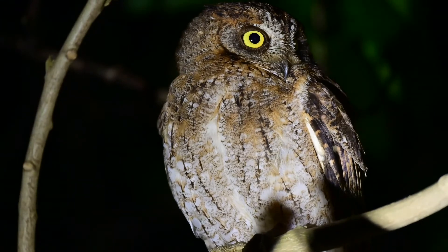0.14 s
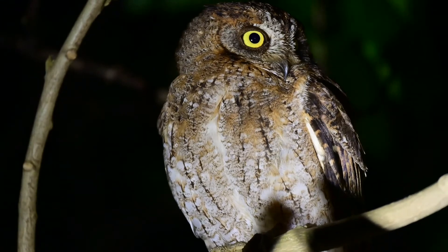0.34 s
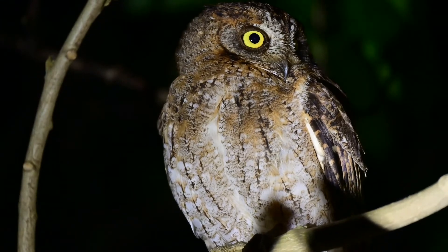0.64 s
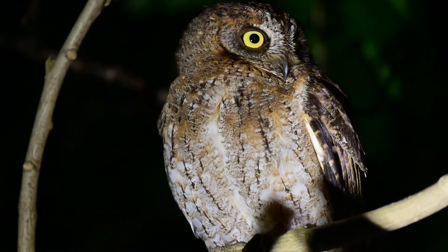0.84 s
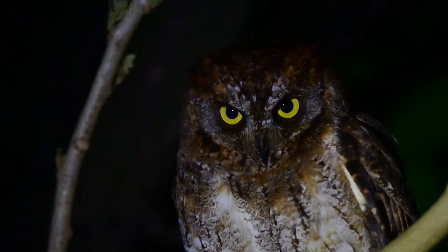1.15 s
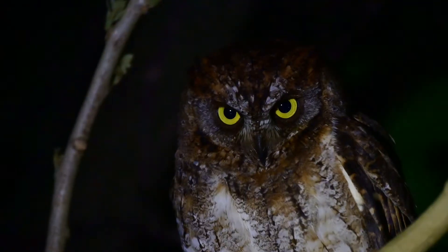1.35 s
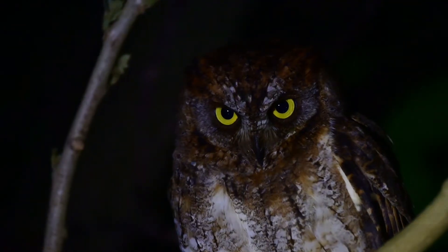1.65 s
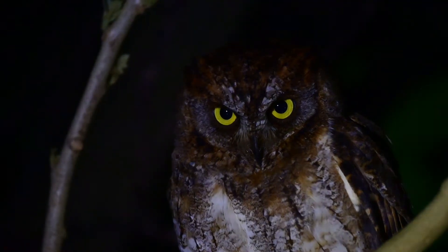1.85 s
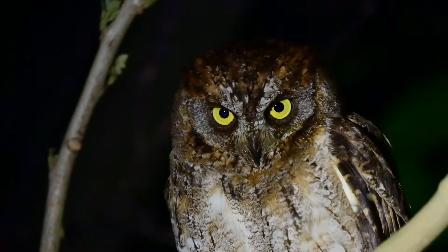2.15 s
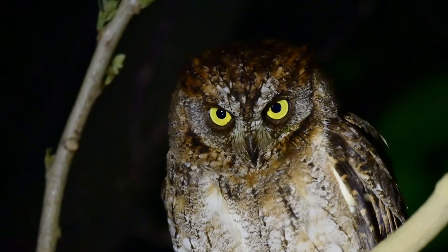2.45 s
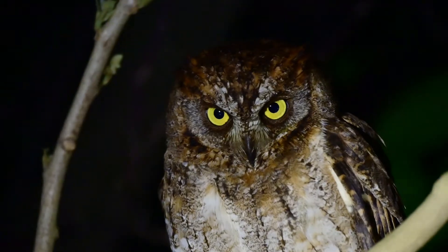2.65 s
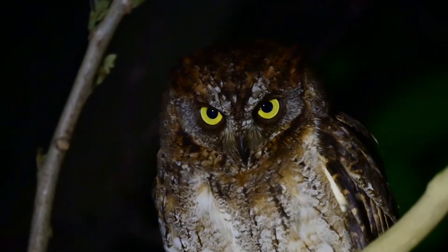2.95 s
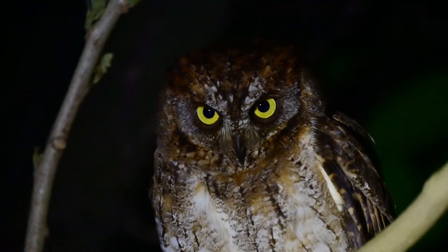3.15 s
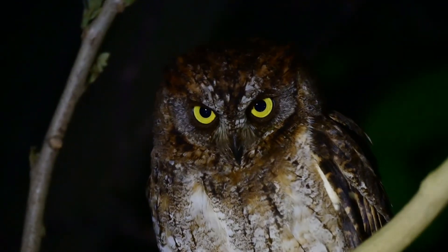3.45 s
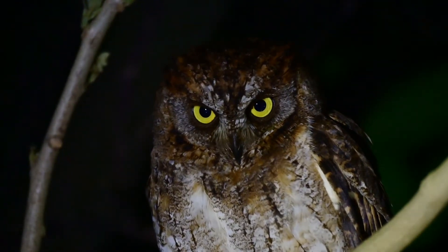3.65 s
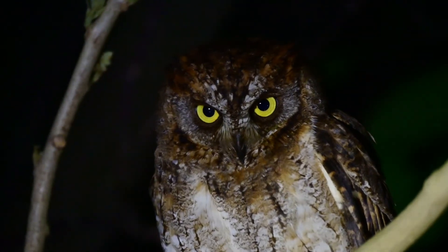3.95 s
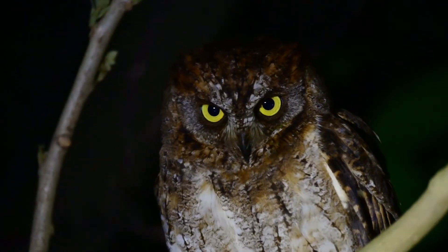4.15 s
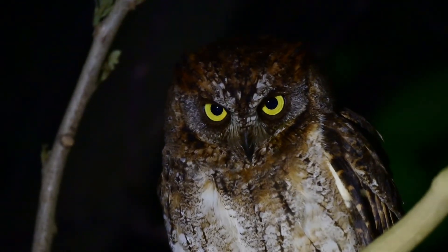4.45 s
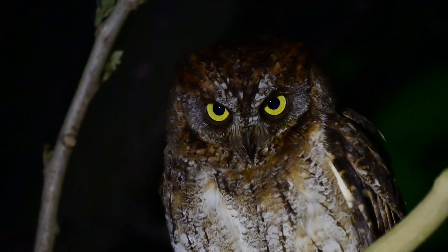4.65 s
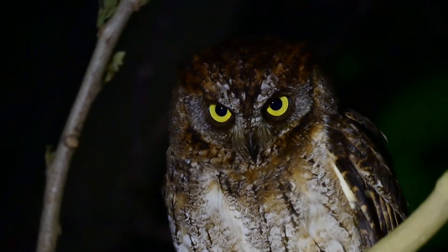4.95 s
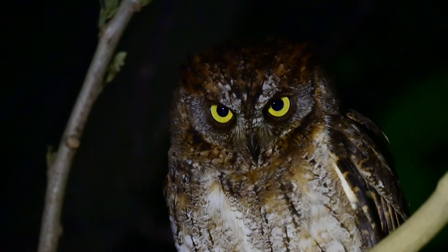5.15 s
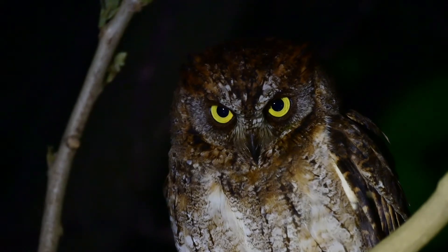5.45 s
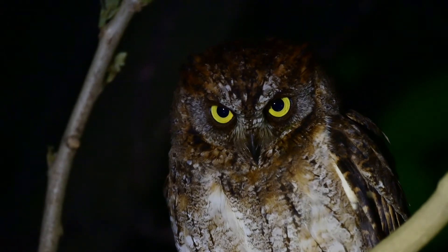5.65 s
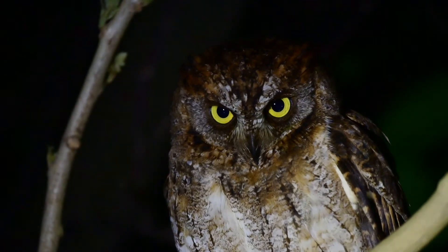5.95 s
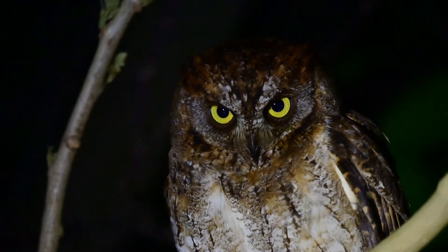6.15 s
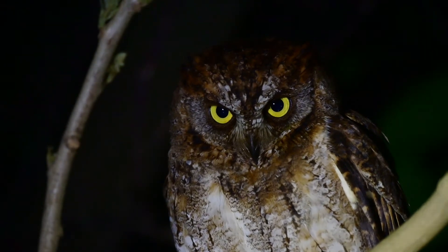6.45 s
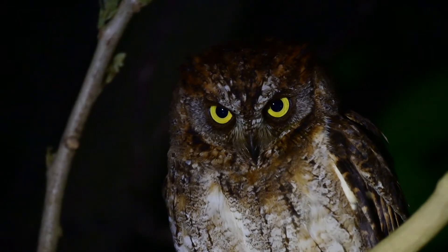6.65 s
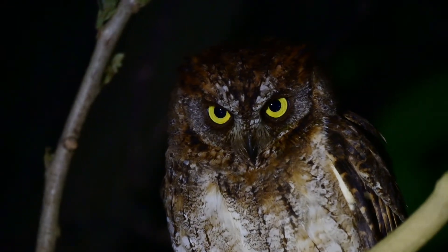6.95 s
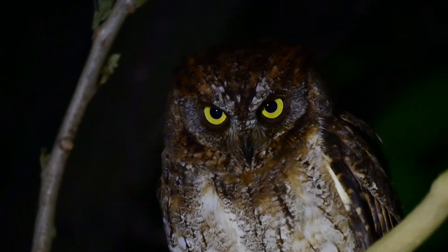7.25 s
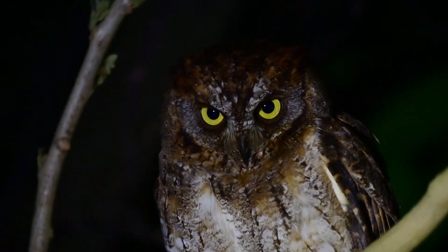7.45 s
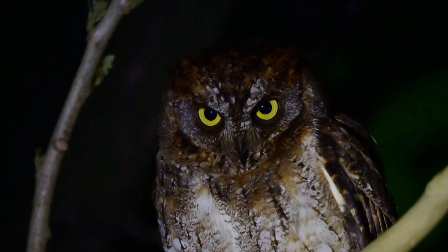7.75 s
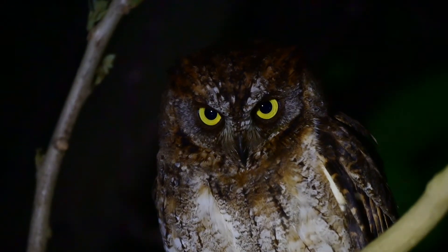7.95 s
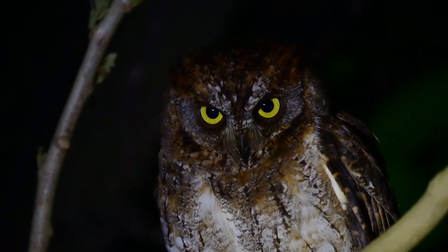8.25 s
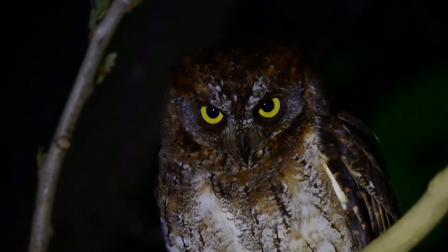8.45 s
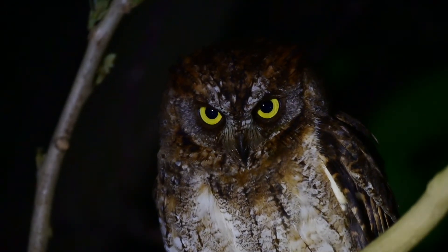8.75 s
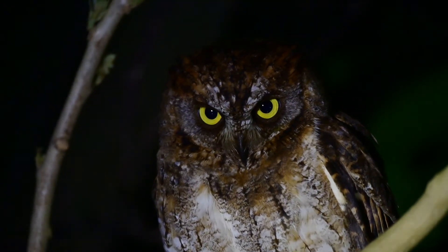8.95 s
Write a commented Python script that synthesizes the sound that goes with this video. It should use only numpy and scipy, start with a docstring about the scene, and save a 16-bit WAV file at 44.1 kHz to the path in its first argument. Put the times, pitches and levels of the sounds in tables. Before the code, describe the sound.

A loud rush of water cuts off abruptly, leaving a quiet night wood where two small owls hoot together over faint cricket chirps and trills.

```python
"""Owls in a wood at night

Two small owls, one low and one higher with a yelp, hoot from the left as gliding tones; the trees echo them.
A third yelps far away. Wing-pulse tones make crickets chirp and trill, and there are a few high peeps.
Ringing modes make drops tick on leaves, rising blips make plinks in water; murmur, hiss and a far chorus
are soft noise. For the first second a loud rush of water, churning noise on the right, covers everything,
then is cut off.
"""
import sys
import numpy as np
from scipy import signal
from scipy.fft import rfft, irfft, next_fast_len
from scipy.io import wavfile
from scipy.ndimage import uniform_filter1d, map_coordinates

SR = 44100
rng = np.random.default_rng(int(sys.argv[2]) if len(sys.argv) > 2 else 0)


def waveform_to_disk(signal):
    """Save audio, clipped to [-1, 1], as 16-bit WAV at the path in sys.argv[1]."""
    frames = np.transpose(np.atleast_2d(signal))
    scaled = np.clip(frames, -1, 1) * 32767
    samples = np.round(scaled).astype(np.int16)
    wavfile.write(sys.argv[1], SR, samples)


N = 400869  # length in samples
LEFT_RIGHT = np.array([[1], [-1]])  # half a left-right difference goes up on the left, down on the right


def amp(db):
    """Turn decibels into a plain factor."""
    return 10 ** (np.asarray(db) / 20)


def unit(x):
    """Scale a sound to an rms of 1."""
    return x / np.sqrt(np.mean(x ** 2) + 1e-20)


def along(points, hz):
    """Read a curve of (Hz, value) points at any frequency, on a log axis."""
    f, v = np.transpose(points)
    return np.interp(np.log(hz + 1), np.log(f + 1), v)


def wobble(rate):
    """A smooth random curve through rate random points a second."""
    knots = rng.standard_normal(int(N * rate / SR) + 4)
    return map_coordinates(knots, [np.arange(N) * rate / SR])


def filtered(x, response):
    """Make each frequency of x louder or softer by response(hz)."""
    m = next_fast_len(N + SR // 2)
    hz = np.fft.rfftfreq(m, 1 / SR)
    return irfft(rfft(x, m) * response(hz), m)[..., :N]


def band(x, center_hz, half_width_hz):
    """Keep a band of frequencies around a center."""
    return filtered(x, lambda hz: 1 / (1 + ((hz - center_hz) / half_width_hz) ** 4))


def add(track, s, sound):
    """Mix a short sound into the track at s seconds."""
    start = round(s * SR)
    part = track[..., start:start + sound.shape[-1]]
    part += sound[..., :part.shape[-1]]


def series(first, last, gap):
    """Shares 0-1 of a span filled with evenly spaced beats about gap apart."""
    return np.linspace(0, 1, round((last - first) / gap) + 1)


def bump(t):
    """A gentle rise and fall over the times t."""
    return np.sin(np.pi * t / t[-1])


def spread(pair, spectrum, alike, side, lead):
    """Color two unrelated noises and mix them to a given likeness, balance and phase lead; their mean has rms 1."""
    def shares(hz):
        turn = np.arccos(np.clip(along(alike, hz), -1, 1)) / 2
        return amp(along(spectrum, hz)) * [np.cos(turn), np.sin(turn)]

    def place(hz):
        lean = amp(along(side, hz) / 2 * LEFT_RIGHT)
        shift = np.exp(.5j * along(lead, hz) * LEFT_RIGHT)
        return shift * lean / np.sqrt(np.mean(lean ** 2, axis=0))

    common, opposite = filtered(pair, shares)
    both = filtered(np.array([common + opposite, common - opposite]), place)
    return both / np.sqrt(np.mean(both.mean(axis=0) ** 2))


def patchy(depth_db):
    """Two white noises sharing patches of random gain in time and frequency."""
    z = signal.stft(rng.standard_normal((2, N)), nperseg=512)[2]
    field = uniform_filter1d(rng.standard_normal(z.shape[1:]), size=6, axis=0)
    field = uniform_filter1d(field, size=10, axis=1)
    return signal.istft(z * amp(depth_db * unit(field)), nperseg=512)[1][:, :N]


def wood(voice, paths, tail_db, t60, dull_hz=20000):
    """Single echoes from big trunks and a scattered tail from all the others; foliage dulls them above dull_hz."""
    t = np.arange(SR) / SR
    # The tail falls by 60 dB in t60 seconds
    tail = rng.standard_normal((2, SR)) * amp(-60 * t / t60) * np.clip(t / .02, 0, 1)
    answer = amp(tail_db) * tail / np.linalg.norm(tail[0])
    for delay, left_db, right_db in paths[1:]:
        answer[:, round(abs(delay) * SR)] += amp([left_db, right_db])
    echoes = signal.fftconvolve(voice[None], answer, axes=1)[:, :N]
    direct = voice * amp(paths[0][1:])[:, None]
    return direct + filtered(echoes, lambda hz: 1 / (1 + (hz / dull_hz) ** 6))


def night():
    """Distant murmur and microphone hiss: soft colored noise whose level drifts slightly."""
    # The still wood. Each row: frequency in Hz, relative level in dB per Hz
    night_spectrum = [(24, -46), (40, -24.5), (100, -13.5), (220, -4.5), (360, -2), (600, -5), (1000, -7),
                      (1500, -13.5), (2500, -17), (3200, -18.5), (4200, -18), (5000, -17), (6500, -20),
                      (15600, -22)]
    # How alike left and right are. Each row: frequency in Hz, likeness from -1 to 1
    night_alike = [(60, 0.98), (180, -0.14), (550, 0.39), (1650, 0.21), (4970, 0.21), (15000, -0.094)]
    # Balance. Each row: frequency in Hz, left-right difference in dB
    night_side = [(60, 3), (150, 0.5), (380, 6.5), (950, 4.5), (2380, 1), (5980, 0), (15000, 0.0)]
    noise = spread(patchy(0.79), night_spectrum, night_alike, night_side, lead=[(60, 0)])
    return amp(-62.0 + 0.37 * wobble(1.707)) * noise


def chorus():
    """Far night chorus: a low band throbbing with fast pulses, perhaps frogs, and two smooth insect bands above it."""
    pulse_hz = 72 + 0.615 * wobble(3)
    pulses = np.maximum(np.sin(2 * np.pi * np.cumsum(pulse_hz) / SR), 0)
    throb = band(pulses * rng.standard_normal((2, N)), 2510, 90)
    haze = band(rng.standard_normal((2, N)), 4050, 250)
    thin = band(rng.standard_normal((2, N)), 5380, 110)
    # Each band swells slowly by itself
    throb = amp(-81.0 + 1.5 * wobble(2.43)) * unit(throb)
    haze = amp(-78.5 + 1.2 * wobble(5)) * unit(haze)
    thin = amp(-83.0 + 3 * wobble(4.9)) * unit(thin)
    return throb + haze + thin


def stroker():
    """A cricket's wing strokes: each slows down, so its pitch falls; uneven teeth roughen it."""
    # Runs of strokes. Each row: first stroke in seconds, last stroke in seconds, level in dB before the wood
    runs = [(1.054, 1.277, -68), (2.419, 2.705, -68), (3.39, 3.461, -69), (4.576, 4.929, -67.5),
            (5.402, 5.47, -70), (5.508, 5.713, -67), (7.698, 8.113, -66), (8.78, 8.978, -65)]
    gap_s, hurry_s = .07, .005  # usual gap; how early the middle of a run falls
    first_db = -5  # a run starts weaker
    out, t = np.zeros(N), np.arange(round(.045 * SR)) / SR
    for first, last, db in runs:
        for u in series(first, last, gap_s):
            s = first + (last - first) * u - 4 * hurry_s * u * (1 - u)
            phase = 2 * np.pi * np.cumsum(4600 - 18000 * t + rng.normal(0, 32)) / SR
            teeth_db = 1.6 * rng.standard_normal(20).repeat(100)[:len(t)]
            level = amp(db + first_db * (1 - u) ** 3 + teeth_db)
            add(out, s - t[-1] / 2, level * bump(t) * np.sin(phase))
    return wood(out, [(0, -9, 0)], tail_db=-10, t60=.5)


def chirper():
    """Five wing pulses a chirp, six before a pause, the last one weaker: an unsteady tone, blurred by leaves."""
    # Bouts of evenly spaced chirps. Each row: first chirp in seconds, last chirp in seconds
    bouts = [(.96, 1.254), (1.673, 4.937), (5.357, 6.785), (7.251, 7.65), (8.061, 8.8)]
    gap_s, chirp_db = .36, -68.8  # usual time between chirps; base level before the wood
    gate, t = np.zeros(N), np.arange(round(0.039 * SR)) / SR
    for first, last in bouts:
        for u in series(first, last, gap_s):
            s = first + (last - first) * u
            extra = [0] if u == 1 else []
            for k, pulse_db in enumerate([1.4, 0.5, 1.7, 1.0] + extra + [-3]):
                level = amp(chirp_db + pulse_db + rng.normal(0, .8))
                add(gate, s - .018 + .0405 * k, level * bump(t))
    tone = np.sin(2 * np.pi * np.cumsum(5100 + 115 * wobble(450)) / SR)
    return wood(gate * tone, [(0, -4, 1.2)], tail_db=-4, t60=.3)


def peeps():
    """Short high notes with a slight fall in pitch."""
    # Each row: middle of the note in seconds, starting pitch in Hz, peak level in dB before the echoes
    notes = [(8.665, 4750, -70), (8.78, 4850, -65), (9.07, 4830, -68)]
    out, t = np.zeros(N), np.arange(round(.035 * SR)) / SR
    for s, hz, db in notes:
        phase = 2 * np.pi * np.cumsum(hz - 2500 * t) / SR
        add(out, s - t[-1] / 2, amp(db) * bump(t) * np.sin(phase))
    return wood(out, [(0, 0, 0)], tail_db=-8, t60=.4)


def plinks():
    """Tiny drops falling into water: each small bubble gives a soft blip whose pitch climbs."""
    # Each row: start in seconds, first pitch in Hz, peak level in dB, left-right difference in dB
    bubbles = [(1.5525, 6060, -50, 3), (4.1072, 5500, -49.5, 2)]
    length_s, rise = 0.0023, .2  # rise: share by which the pitch climbs
    out, u = np.zeros((2, N)), np.linspace(0, 1, round(length_s * SR))
    for s, hz, db, pan_db in bubbles:
        phase = 2 * np.pi * np.cumsum(hz * (1 + rise * u)) / SR
        blip = np.sin(np.pi * u) ** .7 * np.sin(phase)
        add(out, s, amp(db + pan_db / 2 * LEFT_RIGHT) * blip)
    return out


def drops():
    """A tick rings the leaf's modes, each building up over a cycle or two; heavy drops also stir the low ones."""
    # Each row: start in seconds, peak level in dB, left-right difference in dB, boost of the low modes in dB
    hits = [(1.15, -35, -4, 2.5), (3.0819, -36.5, -5, 6.5), (8.4846, -39.5, -1.5, 9)]
    # The leaf's modes. Each row: pitch in Hz, relative level in dB, time to fall by 60 dB in seconds
    leaf = [(490, -16, 0.03), (1000, -9, 0.013), (1710, -1, 0.0041), (3960, -3, 0.0046),
            (6380, -3.5, 0.0032), (10900, -20, 0.0044)]
    out, t = np.zeros((2, N)), np.arange(SR // 20) / SR
    for s, db, pan_db, low_db in hits:
        ring = 0.059 * amp(-60 * t / .03) * rng.standard_normal((2, len(t)))  # a short noisy patter
        for hz, level_db, t60 in leaf:
            decay = amp(level_db + low_db * (hz < 5000) - 60 * t / t60)
            build_up = 1 - np.exp(-.9 * hz * t)
            ring = ring + decay * build_up * np.sin(2 * np.pi * hz * t)
        add(out, s, amp(db + pan_db / 2 * LEFT_RIGHT) * ring / np.abs(ring).max())
    return out


def torrent():
    """Dense sharp splashes on churning noise; the spray thins by its own curve."""
    # Course of the rush. Each row: time in seconds, body level in dB (before a small lift),
    # spray level against the body in dB (only its changes count)
    rush = [(0.0, -35, -3.5), (0.01, -30.5, -9.5), (0.078, -31, -8.5), (0.224, -29.5, -10),
            (0.884, -30, -13.5), (0.94, -31, -14.5)]
    # Color of the water. Each row: frequency in Hz, relative level in dB per Hz
    water = [(24, -74), (40, -50), (203, -21), (334, -11), (656, -8), (743, -3), (821, -6), (1170, 0),
             (1290, -3), (1830, -4.5), (2290, -8), (5090, -18.5), (9260, -29.5), (12500, -47.5),
             (15600, -52)]
    # How alike left and right are. Each row: frequency in Hz, likeness from -1 to 1
    water_alike = [(60, .75), (150, .8), (300, 0.83), (600, 0.6), (1400, 0.42), (3000, 0.33), (5000, .5),
                   (9000, 0.36), (15000, .35)]
    # Balance. Each row: frequency in Hz, left-right difference in dB
    water_side = [(60, -1), (150, -5), (380, -12), (950, -13), (2380, -8.5), (5980, -1), (15000, -3.5)]
    # Phase. Each row: frequency in Hz, lead of the left side in radians
    water_lead = [(60, 0.5), (430, -1.3), (1120, -0.2), (1980, -0.2), (2900, -0.5), (5000, 0.5), (7750, -3),
                  (15000, -3)]
    end_s = 0.95
    s, body_db, spray_db = np.transpose(rush)
    t = np.arange(N) / SR
    hits = rng.random((2, N)) < 2500 / SR  # about 2500 splashes a second on each side
    splashes = hits * amp(2.8 * rng.exponential(size=(2, N)).clip(0, 3))
    churn = patchy(1.0) - 0.77 * unit(splashes)
    flow = spread(churn, water, water_alike, water_side, water_lead)
    spray = filtered(flow, lambda hz: 1 / (1 + (3000 / (hz + 1)) ** 4))
    flow = flow + spray * (amp(np.interp(t, s, spray_db - spray_db.mean())) - 1)
    cut_db = -2500 * np.clip(t - end_s, 0, None)
    return flow * amp(np.interp(t, s, body_db) + 0.4 + cut_db + 0.29 * wobble(26.6))


def hoots(shape, calls, octave_db, fade_db):
    """An almost pure tone with a weak octave, which fades by fade_db a second against the tone."""
    voice = np.zeros(N)
    s, hz, db = np.transpose(shape)
    t = np.arange(0, s[-1], 1 / SR)
    glide = uniform_filter1d(np.interp(t, s, hz), size=200)
    for start, level_db, pitch in calls:
        phase = 2 * np.pi * np.cumsum(pitch * glide) / SR
        octave = amp(octave_db - fade_db * t) * np.sin(2 * phase)
        level = np.sqrt(2) * amp(level_db + np.interp(t, s, db))
        add(voice, start, level * (np.sin(phase) + octave))
    return voice


def owls():
    """Near pair on the left, each singing its one hoot the same way; the far yelp arrives mostly blurred."""
    # Calls. Each row: start in seconds, base level in dB before the wood, pitch as a share of the hoot below
    low_calls = [(3.27, -40, 1.003), (6.366, -41, .997)]
    high_calls = [(3.255, -40.5, 1.001), (6.562, -40, .999)]
    far_calls = [(2.197, -57, .995), (4.497, -55.5, 0.99), (7.327, -60, .9)]
    # Hoots. Each row: time after the start in seconds, pitch in Hz, level against the call's level in dB
    low_hoot = [(0, 664, -28), (.014, 671, -11), (.03, 678, -3), (.077, 662.7, -3.5), (.098, 695, -1),
                (.122, 695, -4.5), (.163, 710, -0.7), (.19, 708, 0), (.217, 698, -4), (.23, 652, -10.5),
                (.243, 662, -8), (.258, 645, -30)]
    high_hoot = [(0, 770, -28), (.017, 776, -14.5), (.045, 787.4, -7.5), (.082, 778.4, -2.5),
                 (.1, 774, -10.5), (.115, 770, 1.2), (.127, 815, -7), (.14, 885, -2), (.165, 880, -6.5),
                 (.184, 845.5, 0), (.205, 823, -14.5), (.227, 813, -4), (.252, 812, -17)]
    far_yelp = [(0, 795, -27), (.01, 800, -9), (.028, 845, -8), (.05, 1005, -6.5), (.072, 848, -0.5),
                (.085, 800, -28)]
    # Paths from each perch, the direct one first. Each row: delay in seconds, left gain in dB, right gain in dB
    low_paths = [(0, 0, -10), (.016, -28, -24), (.071, -29, -29), (.159, -30, -28)]
    high_paths = [(0, 1, -9.5), (.03, -20, -14), (.047, -8.5, -15), (.081, -23, -15), (.098, -16, -28),
                  (.135, -16, -33), (.207, -23, -13.5), (.245, -28, -20)]
    low = hoots(low_hoot, low_calls, octave_db=-17, fade_db=75)
    high = hoots(high_hoot, high_calls, octave_db=-13, fade_db=160)
    far = hoots(far_yelp, far_calls, octave_db=-18, fade_db=50)
    low = wood(low, low_paths, tail_db=-24, t60=1.2, dull_hz=1250)
    high = wood(high, high_paths, tail_db=-21, t60=1.2, dull_hz=1250)
    far = wood(far, [(0, 2.0, -2.8)], tail_db=-2, t60=3.1)
    return low + high + far


def scene():
    """All the sounds of the wood added together."""
    chorus_and_crickets = chorus() + stroker() + chirper()
    water = plinks() + drops() + torrent()
    return night() + chorus_and_crickets + peeps() + water + owls()


def record(dry):
    """Nothing is kept above the band limit."""
    top_hz = 15780
    return filtered(dry, lambda hz: hz < top_hz)


dry = scene()
out = record(dry)
waveform_to_disk(out)
```